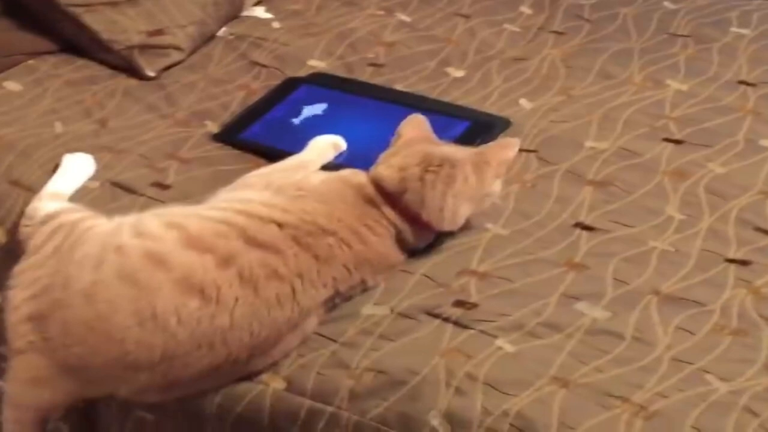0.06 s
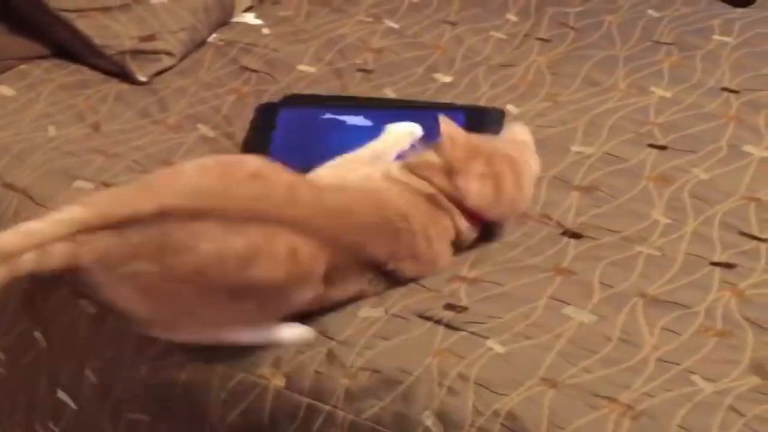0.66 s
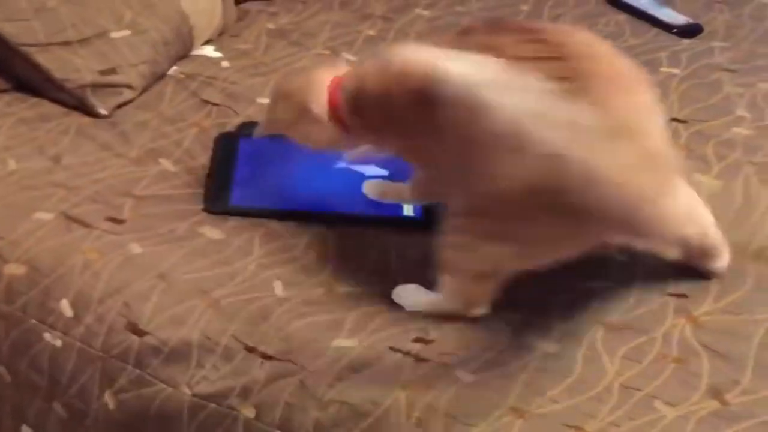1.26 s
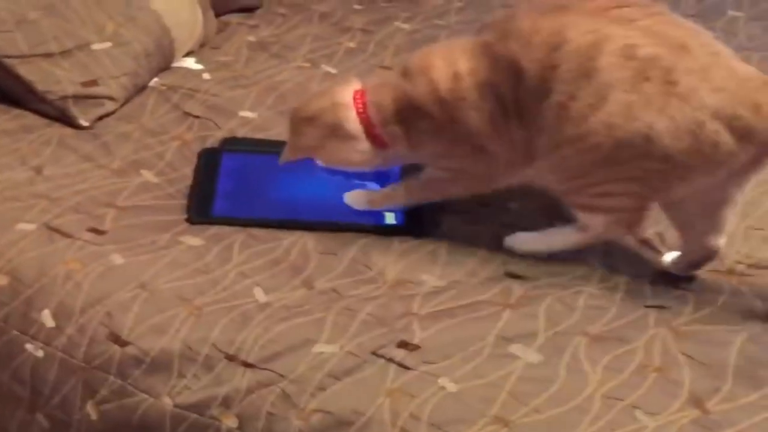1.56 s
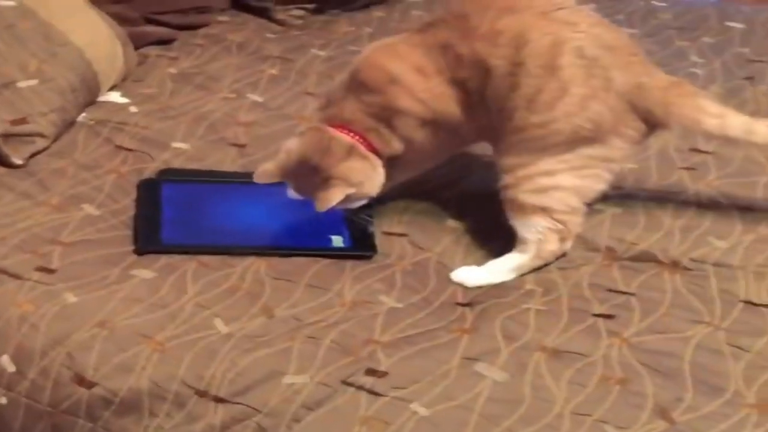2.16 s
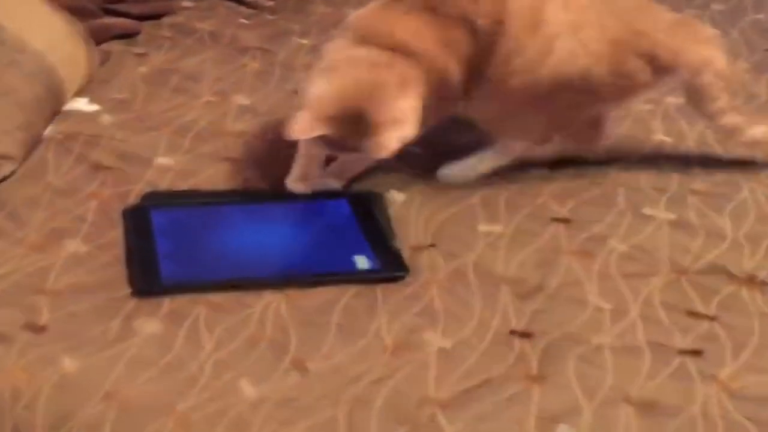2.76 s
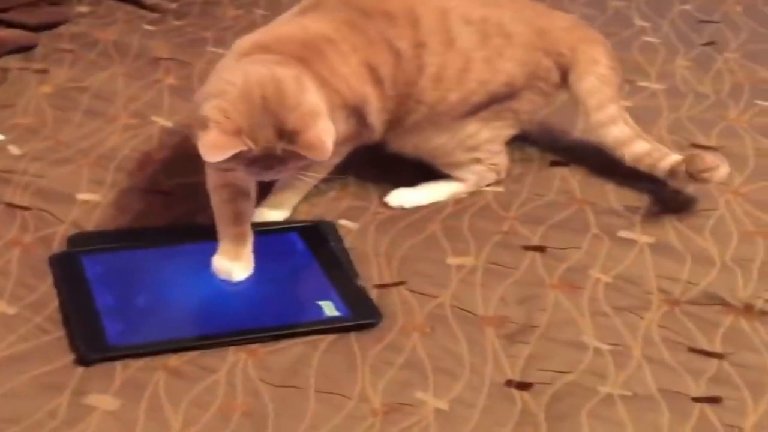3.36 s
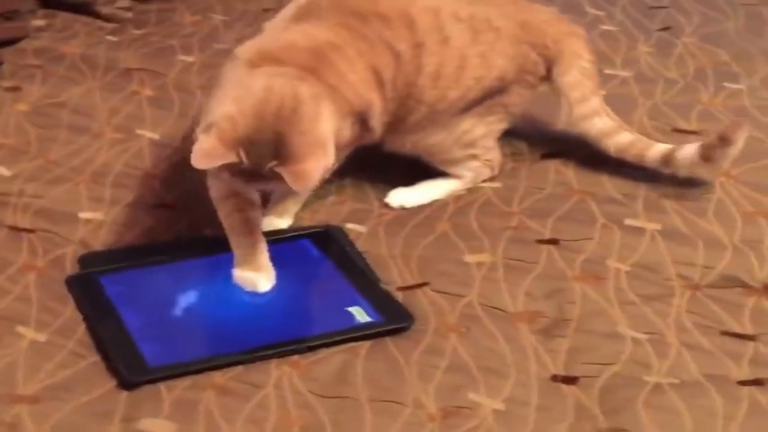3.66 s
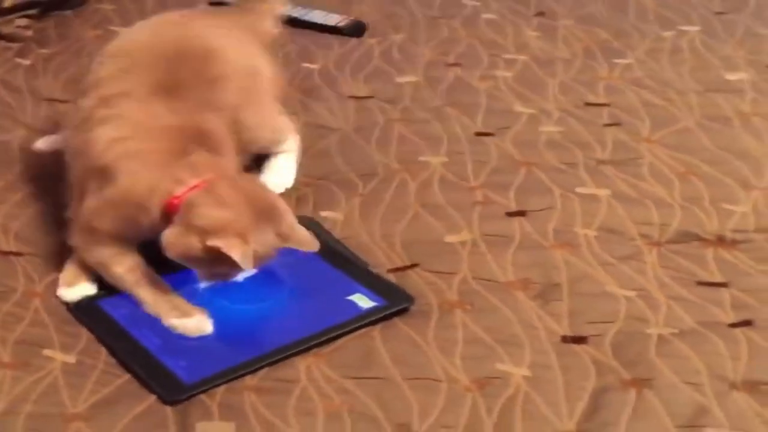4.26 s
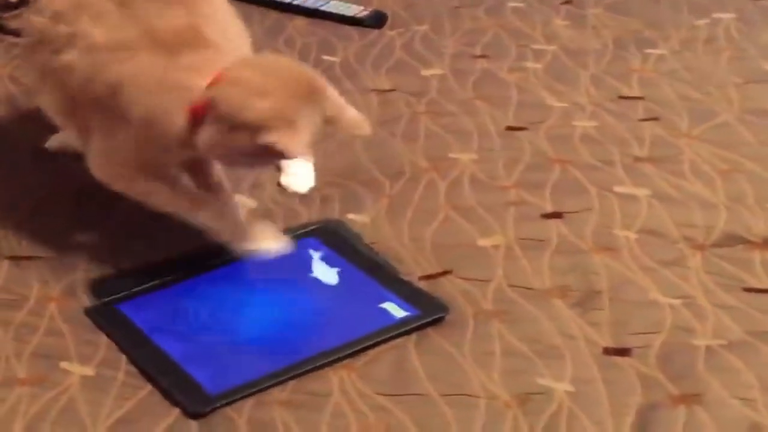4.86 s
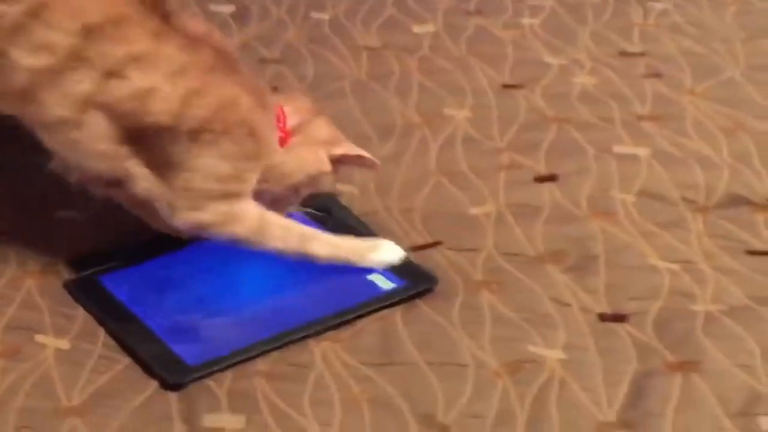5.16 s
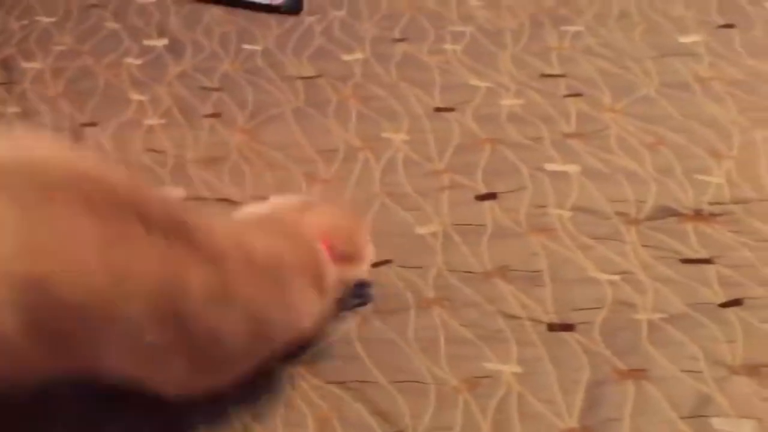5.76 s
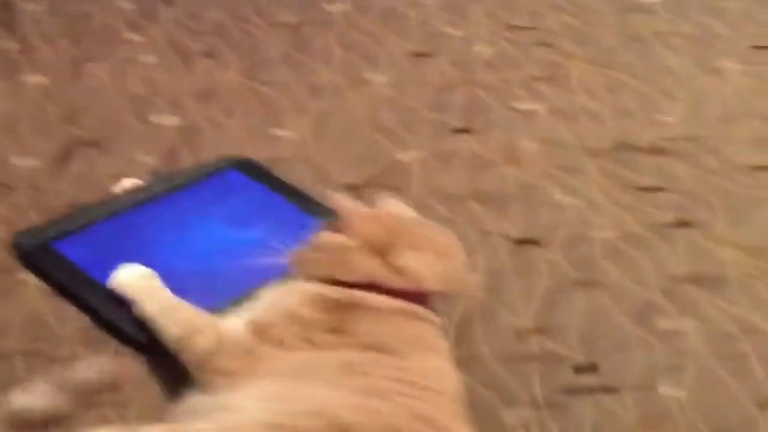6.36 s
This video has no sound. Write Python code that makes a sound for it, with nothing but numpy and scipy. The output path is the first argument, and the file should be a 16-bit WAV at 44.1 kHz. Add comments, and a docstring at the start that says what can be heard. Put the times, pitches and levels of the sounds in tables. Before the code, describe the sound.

A cat's paw knocks on a glass tablet screen amid a rustle of bedspread and a thin collar jingle. Scattered taps and claw clicks follow in small clusters with brief pauses, then two harder knocks. Dull footfalls on the mattress grow busier, a thread snaps off a claw as the collar jingles again, and a few more taps finish. The sounds are near, in a quiet room with a faint steady background.

```python
"""In a quiet room, a cat pounces on a tablet that lies on a bed.
Paws and claws knock on the glass and excite the damped modes of the tablet, while the mattress
thuds under the cat's weight. Fur and feet brush the bedspread by stick-slip friction, and
threads snap off the claws. A small metal piece on the collar jingles by repeated impact.
Short reverberation follows each sound, over a faint steady background."""
import sys
import numpy as np
from scipy import signal
from scipy.fft import rfft
from scipy.io import wavfile
from scipy.ndimage import uniform_filter1d

SR = 44100
rng = np.random.default_rng(int(sys.argv[2]) if len(sys.argv) > 2 else 0)


def digitize_waveform(pressure):
    """Quantize a signal to 16-bit integers and store it at the path in sys.argv[1].

    Rows of a 2-D input are taken as channels; values are limited to [-1, 1].
    """
    field = np.atleast_2d(pressure).T
    bounded = np.clip(field, -1, 1)
    quanta = np.round(bounded * 32767).astype(np.int16)
    wavfile.write(sys.argv[1], SR, quanta)


N = 291894

# background noise spectrum: (frequency [Hz], relative level [dB]), then its overall level [dB]
AIR, AIR_DB = [(15, -61), (25, -18), (42, -6.5), (87, 0), (114, -9.5), (141, 0), (270, -10.5),
               (335, -12.5), (384, -13), (476, -17.5), (840, -19.5), (1260, -23), (1400, -19),
               (14000, -32.5), (16000, -49)], -63.5
# reverberation time: (frequency [Hz], t60 [s])
REVERB_TIMES = [(150, .25), (500, .33), (1400, .27), (4000, .22), (12000, .13)]
# colour of the reflections: (frequency [Hz], gain [dB])
REVERB_SPECTRUM = [(100, 0), (300, -4.5), (480, -2), (900, -6.5), (1600, -4), (2400, -3), (4000, -1.5),
                   (12000, -1)]
# strokes over the bedspread: (start [s], duration [s], dull scuff [dB], bright hiss [dB])
CLOTH_STROKES = [(0.68, 0.1, -63, -61.5), (0.743, 0.12, -49.5, -42.5), (0.841, 0.16, -49.5, -58.5),
                 (0.91, 0.11, -43.5, -57.5), (1.329, 0.15, -50.5, -61), (1.456, 0.19, -56, -68.5),
                 (1.88, 0.12, -62, -65), (1.956, 0.062, -54.5, -58), (2.973, 0.14, -59.5, -63),
                 (3.178, 0.071, -53, -67), (4.171, 0.38, -55.5, -58.5), (4.87, 0.15, -53.5, -64),
                 (4.996, 0.14, -61, -64), (5.509, 0.14, -43, -65), (5.983, 0.073, -51.5, -54.5),
                 (6.037, 0.17, -47.5, -65.5), (6.261, 0.24, -56.5, -65)]
# dull friction spectrum: (frequency [Hz], relative level [dB])
SCUFF_SPECTRUM = [(30, -27), (100, 0.5), (250, -1.5), (500, -7), (1000, -6), (1800, -14.5), (3000, -22.5),
                  (6000, -29.5), (16000, -64)]
# bright friction spectrum: (frequency [Hz], relative level [dB])
HISS_SPECTRUM = [(30, -36), (700, -4), (2000, 15.5), (3500, 10), (5200, 10), (7000, 3.5), (10000, -2.5),
                 (12500, -1), (16000, -9)]
# claws snagging in the bedspread: (time [s], peak level [dB])
CLAW_SNAGS = [(0.756,-44), (0.7635,-39), (0.81,-38), (0.914,-44), (1.578,-47.5), (1.915,-49), (3.209,-48),
              (4.197,-48), (5.008,-41.5), (5.025,-40), (5.5628,-28.5)]
# feet landing on the mattress: (time [s], level [dB], frequency [Hz])
FOOTFALLS = [(0.955,-39.5,175), (1.399,-45,83), (1.521,-40,214), (4.272,-34,104), (4.453,-37.5,163),
             (5.234,-36.5,278), (5.388,-40,110), (5.495,-30.5,260), (5.519,-35,255), (6.009,-40.5,160),
             (6.030,-44,57.2), (6.073,-35,112), (6.148,-34,100), (6.153,-36.5,222)]
# collar shakes: (time [s], duration [s] or 0 for one strike, level [dB], gain of upper modes [dB])
COLLAR_SHAKES = [(0.764,.07,-31,-11), (0.929,.04,-42,1), (1.016,.04,-42,-7), (1.380,0,-56,-6),
                 (1.433,0,-50,-6), (1.9553,0,-44.5,-4), (2.1118,0,-50,9), (2.902,0,-39,12), (4.223,0,-44,2),
                 (4.305,.06,-42,-1), (4.555,.07,-34,3), (4.931,.04,-43,23), (5.009,0,-37,-8),
                 (5.0728,0,-43.5,-3), (5.41,0,-46,-17), (5.561,.09,-29,7), (6.001,.04,-44,5),
                 (6.576,0,-38.5,-18)]
# modes of the collar's metal: (frequency [Hz], relative level [dB], nominal t60 [s])
COLLAR_MODES = [(4850, -6.5, 0.043), (4883, -1, 0.047), (5100, -7.5, 0.022), (5500, -11.5, 0.042),
                (6030, -4, 0.018), (6310, -7, 0.012), (8430, -10, 0.025), (11330, -8, 0.031),
                (11490, -1, 0.037), (11970, 0, 0.03), (12620, 2.5, 0.029), (15000, -19, 0.031)]
# modes of glass and case: (frequency [Hz], relative level [dB], t60 [s])
TABLET_MODES = [(432, -5.5, 0.02), (606, 1.5, 0.02), (852, 8.5, 0.033), (953, -10, 0.03), (1207, 0, 0.056),
                (1513, -2, 0.024), (1712, 9, 0.0083), (2173, 9, 0.011), (2820, -17, 0.0156),
                (3600, -25, .02)]
# spectrum of a claw on glass: (frequency [Hz], relative level [dB])
CLACK_SPECTRUM = [(300, -15), (1200, -17), (1800, -1), (2250, 6.5), (2800, -26), (3500, -4), (4200, -15.5),
                  (5500, -25), (16000, -44.5)]
# paw strikes on the tablet: (time [s], level [dB], contact frequency [Hz],
# relative claw strength [dB], mattress thud level [dB], thud frequency [Hz])
PAW_STRIKES = [(0.7836,-20,1170,-23.5,-36,250), (0.871,-33,1120,-33,-42,173),
               (1.2943,-20.5,1004,-29,-37,387), (1.3522,-21.5,847,-20.5,-40,396),
               (1.869,-42,870,-30,-62,300), (2.027,-32.5,836,-23,-56,295), (2.690,-23.5,716,-6.5,-44,566),
               (2.9132,-20.5,1010,-14.5,-51,530), (3.040,-28.5,1100,-18.5,-41,99),
               (3.049,-29.5,803,-11.5,-51,252), (3.205,-25,1000,-12,-30,155.5),
               (4.1654,-13.5,1110,-16.5,-31,180), (4.3276,-9.5,1183,-26,-30.5,430),
               (4.822,-48.5,680,-14.5,-60,300), (4.891,-42,626,-16,-41,270),
               (5.2692,-20,1120,-6.5,-43.5,273), (5.370,-20.5,1260,-14.5,-34.5,288),
               (5.699,-40,1130,-18.5,-40,152), (6.089,-26,830,-37,-32,258.5),
               (6.138,-30.5,680,-20.5,-36.5,200), (6.311,-40.5,575,-32,-46,199.6),
               (6.359,-20,1150,-8.5,-25.5,212), (6.482,-34,770,-25.5,-39,168), (6.616,-40,874,-2.5,-43,295)]


def amp(db):
    """Decibels to amplitude ratio."""
    return 10 ** (np.asarray(db) / 20)


def unit_rms(x):
    """Normalisation to an rms of 1."""
    return x / np.sqrt(np.mean(x ** 2) + 1e-20)


def unit_peak(x):
    """Normalisation to a peak of 1."""
    return x / (abs(x).max() + 1e-20)


def read(points, hz):
    """Interpolation on a log-frequency axis."""
    f, value = np.transpose(points)
    return np.interp(np.log(hz + 1), np.log(f + 1), value)


def add(mix, s, sound):
    """Superposition of a sound at time s."""
    part = mix[max(round(s * SR), 0):][:len(sound)]
    part += sound[:len(part)]


def colour(x, spectrum):
    """Spectral shaping, at an rms of 1."""
    gain = amp(read(spectrum, np.fft.rfftfreq(len(x), 1 / SR)))
    return unit_rms(np.fft.irfft(rfft(x) * gain, len(x)))


def band(x, low_hz, high_hz, order=2):
    """Causal band-pass filtering."""
    edges = [low_hz, min(high_hz, .49 * SR)]
    return signal.sosfilt(signal.butter(order, edges, "band", fs=SR, output="sos"), x)


def mode(t, hz, t60):
    """Exponential decay of one resonance."""
    return amp(-60 * t / t60) * np.sin(2 * np.pi * hz * t)


def bump(t, rise_s):
    """A force pulse: it peaks at 1 after the rise time, then lets go."""
    return t / rise_s * np.exp(1 - t / rise_s)


def crackle(t, rise_s):
    """Superposition: many tiny contacts sum to a burst of noise."""
    return rng.standard_normal(len(t)) * bump(t, rise_s)


def background():
    """Stationary noise: faint, steady and densest in the bass."""
    return amp(AIR_DB) * colour(rng.standard_normal(N), AIR)


def room(x, first_echo_s=0.0044, echoes_per_s=4000, shift_hz=1.3):
    """Reverberation: each band decays at its own rate; the echoes shift as cat and microphone move."""
    size, out = SR // 2, np.zeros(N)
    phase = 2 * np.pi * shift_hz * np.arange(N) / SR
    for k in range(3):  # crossfade among three echo patterns
        echoes = rng.standard_normal(size) * (rng.random(size) < echoes_per_s / SR)
        echoes *= np.arange(size) > first_echo_s * SR
        hz, t, bands = signal.stft(echoes, SR, nperseg=256)
        bands *= amp(-60 * t / read(REVERB_TIMES, hz)[:, None])
        bands /= np.linalg.norm(signal.istft(bands, SR, nperseg=256)[1])  # unit energy
        tail = signal.istft(bands * amp(read(REVERB_SPECTRUM, hz))[:, None], SR, nperseg=256)[1]
        share = np.sqrt(2 / 3) * np.cos(phase + k * np.pi / 3)
        out += signal.oaconvolve(x * share, tail)[:N]
    return out


def fibres(catches_per_s=350, catch_db=15, grip_spread_db=3.5):
    """Stick-slip friction: the weave catches and lets go in uneven clumps."""
    catches = (rng.random(N) < catches_per_s / SR) * np.minimum(rng.exponential(1, N), 3)
    catches *= rng.choice([-1, 1], N)
    grip = amp(grip_spread_db * unit_rms(uniform_filter1d(rng.standard_normal(N), SR // 200)))
    return grip * (rng.standard_normal(N) + amp(catch_db) * catches)


def brushing(rise_share=0.26):
    """Friction noise follows sliding speed, so each stroke over the bedspread swells and fades."""
    scuff, hiss = np.zeros(N), np.zeros(N)
    for s, length, scuff_db, hiss_db in CLOTH_STROKES:
        speed = np.interp(np.arange(0, length, 1 / SR) / length, [0, rise_share, 1], [0, 1, 0])
        add(scuff, s, amp(scuff_db) * speed)
        add(hiss, s, amp(hiss_db) * speed)
    return scuff * colour(fibres(), SCUFF_SPECTRUM) + hiss * colour(fibres(), HISS_SPECTRUM)


def snags(rise_s=0.0005):
    """Sudden release of tension: a thread slips off a claw with a dry snap."""
    out, t = np.zeros(N), np.arange(SR // 30) / SR
    for s, db in CLAW_SNAGS:
        add(out, s, amp(db) * unit_peak(band(crackle(t, rise_s), 3600, 8500)))
    return out


def mattress_thuds(tap_cycles=6.5, step_cycles=10.6, rise_s=0.0011, puff_db=-7):
    """A damped oscillator: the mattress bounces under each load, with a puff from the bedspread."""
    out, t = np.zeros(N), np.arange(SR // 4) / SR
    loads = [(s, db, hz, tap_cycles) for s, *_, db, hz in PAW_STRIKES]
    loads += [(s, db, hz, step_cycles) for s, db, hz in FOOTFALLS]
    for s, db, hz, cycles in loads:
        bounce = unit_peak(mode(t, hz, t60=cycles / hz) * (1 - np.exp(-t / rise_s)))
        puff = unit_peak(band(crackle(t, rise_s=0.0067), 70, 420))
        add(out, s, amp(db) * (bounce + amp(puff_db) * puff))
    return out


def collar_strikes(swing_s=0.027, swing_loss_db=6.5, clinks_per_s=14, clink_db=-60, spread_db=4):
    """Damped swinging: each strike is weaker. Yields (time [s], level [dB], upper-mode gain [dB])."""
    for s, length, db, upper_db in COLLAR_SHAKES:
        gaps = swing_s * (1 + 0.21 * rng.uniform(-0.86, 1, size=8))
        for k, delay in enumerate(np.cumsum(gaps) - gaps[0]):
            if k * swing_s <= length:
                yield s + delay, db - k * swing_loss_db, upper_db
    # faint random clinks as the cat moves over the bedspread
    for s, length, *_ in CLOTH_STROKES:
        delays = np.cumsum(rng.exponential(1, size=8)) / clinks_per_s
        for delay, force, tilt in zip(delays, *rng.standard_normal((2, len(delays)))):
            if delay < length:
                yield s + delay, clink_db + spread_db * force, spread_db * tilt


def collar_jingle(click_db=-17, rattle_db=-5, rattle_s=0.02, contacts_per_s=260, rise_s=0.0004):
    """Free vibration: struck metal rings in a lower and an upper group of modes, then rattles on."""
    out, t = np.zeros(N), np.arange(SR // 6) / SR
    for s, db, upper_db in collar_strikes():
        scatter_db = 4.5 * rng.standard_normal(len(COLLAR_MODES))
        detune = 0.002 * rng.standard_normal(len(COLLAR_MODES))
        decay_scale = 2 ** (rng.random() - 0.5)  # fur damps some strikes more than others
        ring = np.zeros(len(t))
        for (hz, mode_db, t60), extra_db, shift in zip(COLLAR_MODES, scatter_db, detune):
            gain = amp(mode_db + upper_db * (hz > 8000) + extra_db)
            ring += gain * mode(t, hz * (1 + shift), t60 * decay_scale)
        ring = unit_peak(ring * (1 - np.exp(-t / rise_s)))
        click = unit_peak(band(crackle(t, rise_s=0.00072), 4800, 14000))
        clink = ring + amp(click_db) * click
        contacts = (rng.random(len(t)) < contacts_per_s / SR) * rng.uniform(-1, 1, len(t))
        contacts *= amp(rattle_db) * np.exp(-t / rattle_s)
        contacts[0] = 1  # the strike itself
        add(out, s, amp(db) * signal.fftconvolve(contacts, clink)[:len(t)])
    return out


def tablet_case(t, contact_hz, width_octaves=1.2, ring_db=-12, chatter_db=-14):
    """Resonance: a contact feeds the modes near its own frequency, and the case chatters."""
    ring = np.zeros(len(t))
    for hz, mode_db, t60 in TABLET_MODES:
        coupling = np.exp(-(np.log2(hz / contact_hz) / width_octaves) ** 2 / 2)
        gain = amp(mode_db + 2 * rng.standard_normal())  # where the paw lands changes the mix
        ring += gain * coupling * mode(t, hz * rng.uniform(1.0, 1.03), t60) * rng.choice([-1, 1])
    ring = unit_peak(ring * (1 - np.exp(-t * contact_hz)))
    chatter = unit_peak(band(crackle(t, rise_s=0.003), 0.59 * contact_hz, 2.06 * contact_hz, order=3))
    return amp(ring_db) * ring + amp(chatter_db) * chatter


def tablet_knocks(swell_cycles=0.82, rock_s=0.00218, rock_db=-7, clack_db=6):
    """Impact on a plate: a paw flexes the glass briefly, the tablet rocks back and a claw clacks."""
    out, t = np.zeros(N), np.arange(SR // 8) / SR
    for s, db, hz, claw_db, *_ in PAW_STRIKES:
        flex = bump(t, swell_cycles / hz) ** 2.52 * np.sin(2 * np.pi * hz * t)
        blow = flex.copy()
        add(blow, rock_s * rng.uniform(0.725, 1.24), amp(rock_db) * flex)
        case_db = 13 + 0.63 * claw_db  # the more claw in a strike, the more the case rings
        # a small plate radiates little bass, and the soft pad puts in little treble
        body = band(blow + amp(case_db) * tablet_case(t, hz), 300, 4500)
        clack = unit_peak(colour(rng.standard_normal(len(t)), CLACK_SPECTRUM) * bump(t, rise_s=0.00044))
        add(out, s, amp(db) * (body + amp(clack_db + claw_db) * clack))
    return out


def scene(knock_send_db=-6, bed_send_db=-9, collar_send_db=-5):
    """Superposition: direct sound, reverberation and background add at the microphone."""
    knocks, jingle = tablet_knocks(), collar_jingle()
    bed = band(mattress_thuds() + brushing() + snags(), 35, 0.49 * SR)
    reverb = room(amp(knock_send_db) * knocks + amp(bed_send_db) * bed + amp(collar_send_db) * jingle)
    return (background() + reverb + bed + jingle + knocks)[None]


def record(dry, low_hz=24, high_hz=15900):
    """Band limiting: the microphone loses the deepest bass, the recorder the highest treble."""
    highpass = signal.butter(2, low_hz, "high", fs=SR, output="sos")
    lowpass = signal.firwin(511, high_hz, window=("kaiser", 9), fs=SR)
    return signal.oaconvolve(signal.sosfilt(highpass, dry), lowpass[None], "same")


dry = scene()
out = record(dry)
digitize_waveform(out)
```